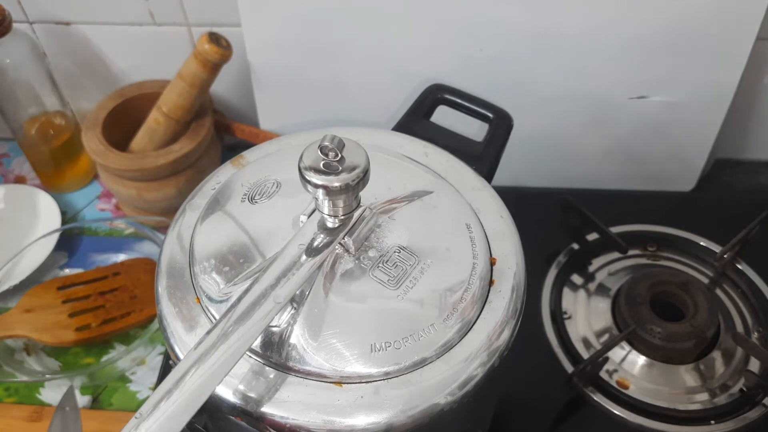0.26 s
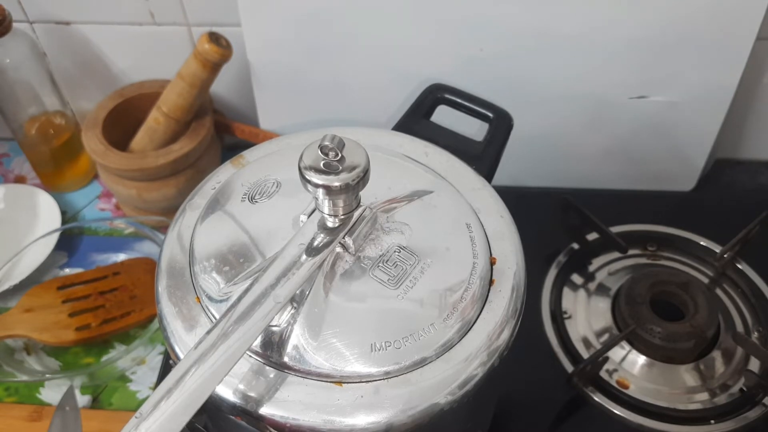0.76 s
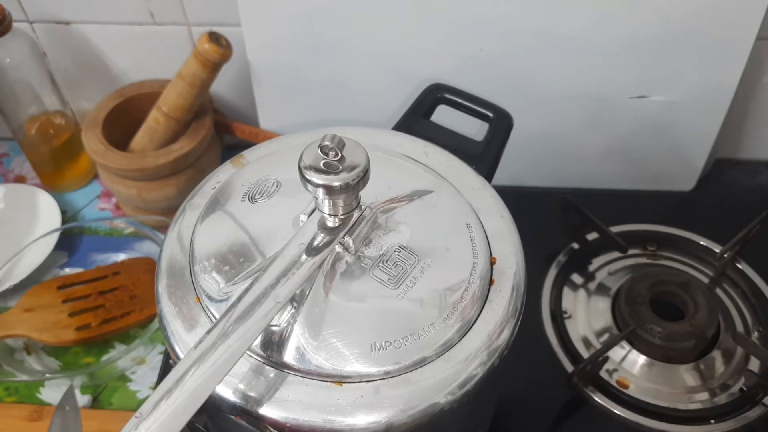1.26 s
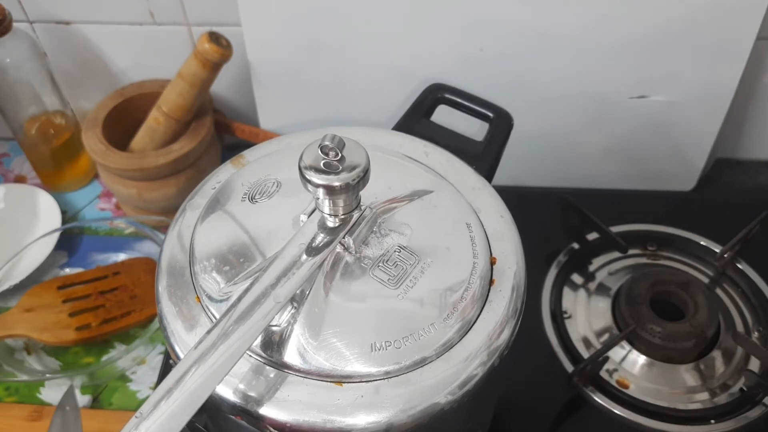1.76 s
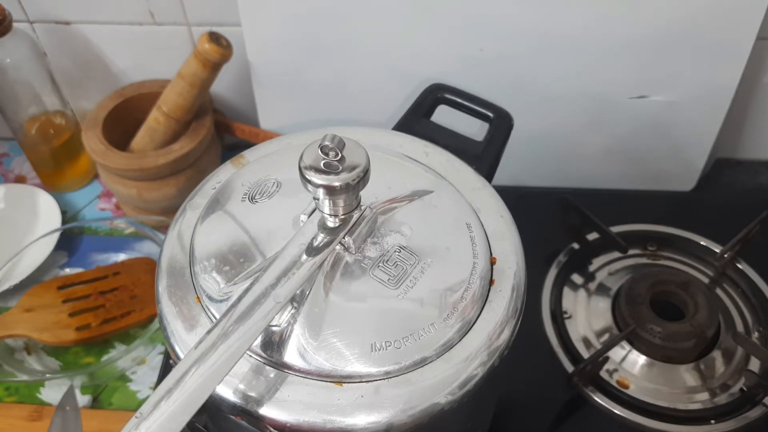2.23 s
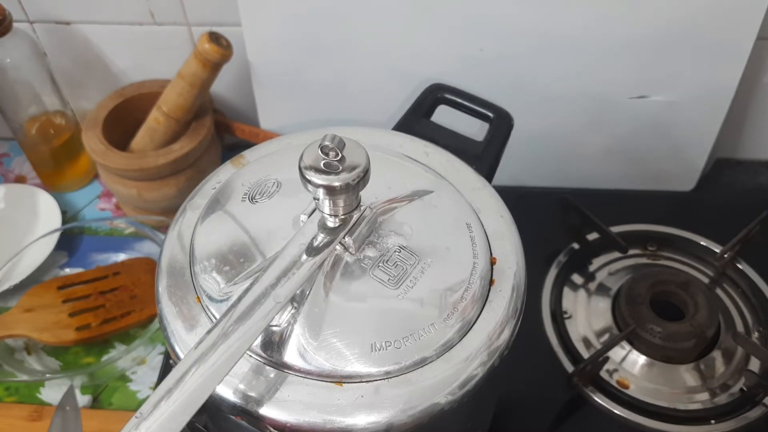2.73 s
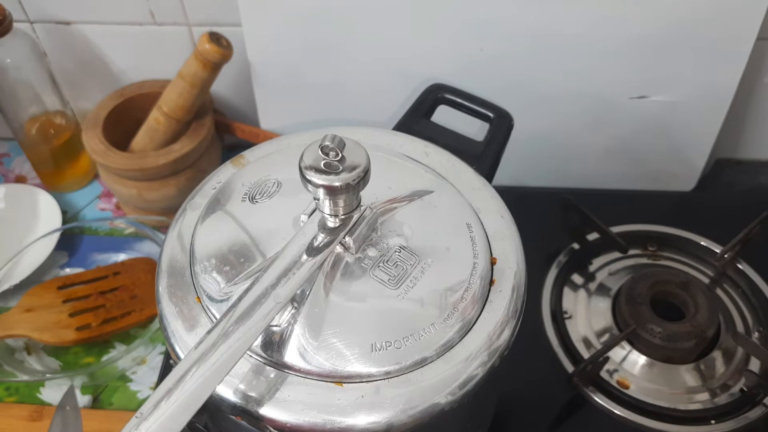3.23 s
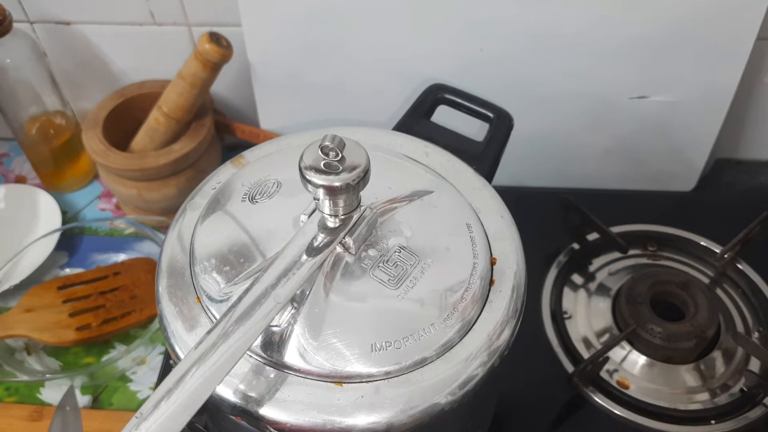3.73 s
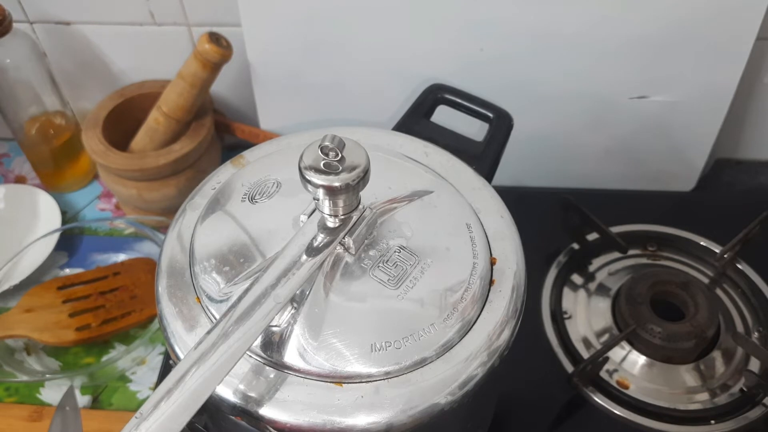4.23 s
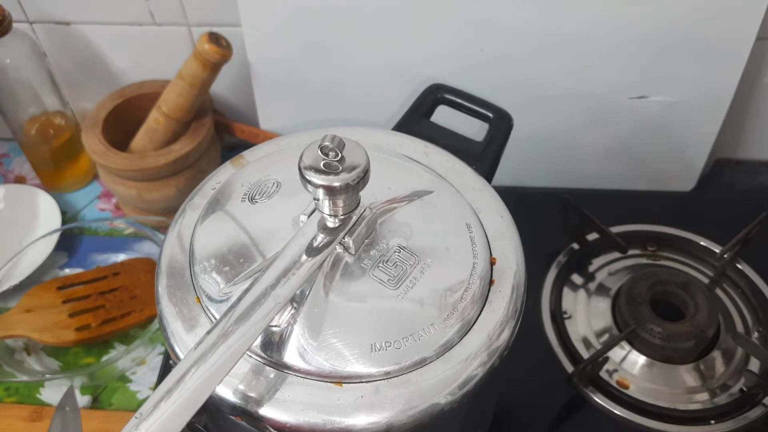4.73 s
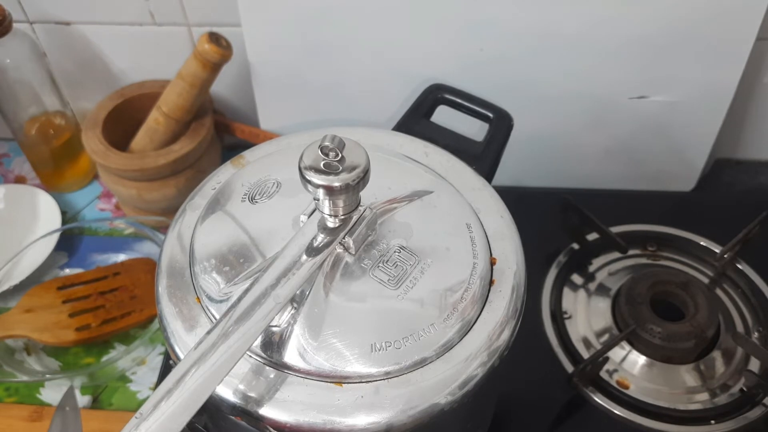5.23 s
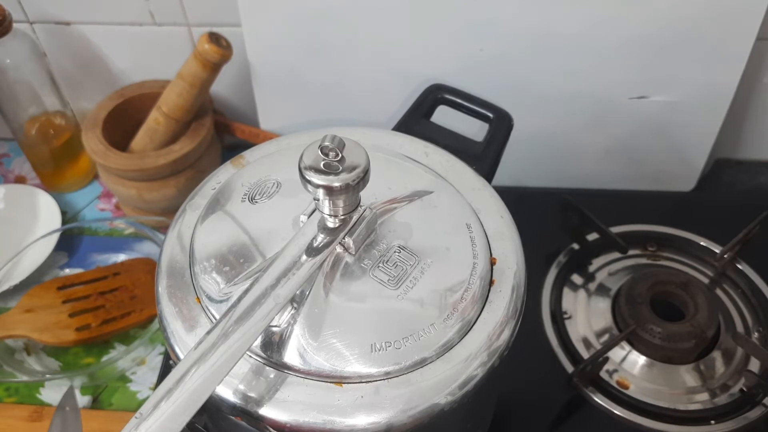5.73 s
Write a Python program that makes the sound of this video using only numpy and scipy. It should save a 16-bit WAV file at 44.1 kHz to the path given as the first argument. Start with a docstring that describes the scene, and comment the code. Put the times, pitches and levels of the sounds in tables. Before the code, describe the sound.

Close up in a kitchen, steam leaks from a pressure cooker's valve with a thin, bright, fizzy hiss that never stops. It wavers unevenly at first, with a few tiny spits of water, holds steadier through the middle, then swells and dips again toward the end. The gas burner and a low hum are barely audible beneath it.

```python
"""Pressure cooker on a gas stove.

Steam hisses around the weight valve, surging and sagging. High flow lifts the weight and adds a rasp;
condensate spits in the gap. Valve, lid and wall colour both. Underneath: the plume's dull rush, the burner, a
faint hum and, near the end, one soft rustle."""
import sys
import numpy as np
from scipy import signal
from scipy.fft import rfft, irfft
from scipy.io import wavfile

SR = 44100
rng = np.random.default_rng(int(sys.argv[2]) if len(sys.argv) > 2 else 0)


def dump(signal):
    """Clip the signal to [-1, 1] and save it as 16-bit WAV at the path in sys.argv[1]."""
    limited = np.clip(np.atleast_2d(signal).T, -1, 1)
    pcm = np.round(limited * 32767).astype(np.int16)
    wavfile.write(sys.argv[1], SR, pcm)


N = 263718
TIME_S, FREQ_HZ = np.arange(N) / SR, np.fft.rfftfreq(N, 1 / SR)

# Jet surges. Each row: time in seconds, flow in dB, treble fizz in dB; levels act about their means.
JET_LEVELS = [(0.02, -30.3, -43.1), (0.28, -29.3, -39.4), (0.63, -30.4, -42.8), (0.79, -29.0, -38.1),
              (0.91, -31.6, -43.5), (1.13, -27.4, -38.7), (1.19, -31.3, -42.2), (1.25, -28.7, -38.1),
              (1.45, -28.8, -39.5), (1.58, -31.1, -43.8), (1.88, -28.8, -38.7), (1.96, -29.8, -41.9),
              (2.08, -28.3, -38.7), (2.23, -30.9, -44.2), (2.33, -29.0, -39.4), (3.56, -31.2, -40.7),
              (4.05, -27.2, -38.1), (4.13, -28.6, -39.7), (4.18, -31.4, -40.1), (4.45, -31.3, -42.4),
              (4.68, -29.1, -37.0), (4.98, -29.6, -39.0), (5.07, -30.8, -39.9), (5.33, -31.2, -39.7),
              (5.43, -32.8, -43.3), (5.55, -28.3, -36.4), (5.67, -27.4, -35.9), (5.77, -29.4, -39.0),
              (5.95, -28.7, -38.1)]
# Smooth jet spectrum. Each row: frequency in Hz, relative density in dB.
JET_SHAPE = [(2300, -27.5), (3250, -20.5), (3650, -7.5), (4900, -6), (5300, 0.15), (6300, -8), (8000, -3.5),
             (9900, 0.5), (10400, -4.5), (11600, -3), (13800, -5), (14300, -8), (15000, -14), (15700, -28)]
# Valve cap and lid resonances. Each row: centre in Hz, width in Hz, boost in dB.
VALVE_MODES = [(3041, 196, 4.4), (3732, 35, 2.0), (4115, 183, 2.0), (4706, 113, 4.6), (5307, 72, 1.6),
               (5672, 259, 6.8), (5906, 35, 6.8), (6085, 56, 7.7), (6350, 210, 8.9), (6693, 259, 8.3),
               (6906, 259, 9.0), (7201, 259, 5.9), (7340, 134, 2.4), (7599, 180, 7.3), (7952, 259, 11.0),
               (8306, 238, 10.9), (8682, 159, 6.7), (8770, 126, 4.2), (9071, 259, 7.9), (9358, 157, 5.1),
               (9626, 259, 6.3), (9916, 232, 4.7), (10278, 133, 7.2), (10581, 116, 7.0), (10901, 138, 6.0),
               (12450, 65, 3.3)]
# Steam plume spectrum. Each row: frequency in Hz, relative density in dB.
PLUME_SHAPE = [(150, -20), (500, -6), (1000, 1), (1600, 1.5), (2200, -1), (2800, 3), (5000, -21)]
# Gas flame and kitchen spectrum. Each row: frequency in Hz, relative density in dB.
BURNER_SHAPE = [(20, -17), (36, -13), (48, 2.5), (80, -2), (120, -1), (165, -8), (195, -4), (225, -12.5),
                (300, -8), (450, -11.5), (600, -15), (1000, -20.5), (2500, -16.5), (6000, -45)]
# Kitchen hum. Each row: frequency in Hz, rms level in dB.
HUM_TONES = [(99, -73), (145.5, -71.5), (409, -81)]
# Large condensate spits. Each row: start in seconds, level in dB ahead of the valve.
LARGE_SPITS = [(.550, -24.5), (0.985, -23.5), (1.797, -22), (1.995, -28), (2.080, -21.5), (3.012, -30),
               (3.974, -23), (5.665, -26), (5.686, -26)]


def gain_of(db):
    return 10 ** (np.asarray(db) / 20)


def unit_rms(x):
    return x / np.sqrt(np.mean(x ** 2) + 1e-20)


def over_freq(points):
    """Interpolates (Hz, value) points over log frequency."""
    hz, value = np.transpose(points)
    return np.interp(np.log(FREQ_HZ + 1), np.log(hz + 1), value)


def peak(centre_hz, width_hz):
    """Resonance curve of height 1."""
    return 1 / (1 + (2 * (FREQ_HZ - centre_hz) / width_hz) ** 2)


def filtered(x, response):
    return irfft(rfft(x) * response, N)


def noise(response):
    return unit_rms(filtered(rng.standard_normal(N), response))


def wander(rate_hz):
    """Random drift of rms 1, up to about rate_hz."""
    return noise(1 / (1 + (FREQ_HZ / rate_hz) ** 2))


def minimum_phase(db):
    """Response that rings only after it is struck."""
    cepstrum = irfft(np.log(gain_of(np.maximum(db, -100))), N)
    fold = np.r_[1, np.full(N // 2 - 1, 2), 1, np.zeros(N // 2 - 1)]
    return np.exp(rfft(cepstrum * fold))


def jet_swing_db():
    """Flow and fizz per sample, each about its mean."""
    times_s, *columns = np.transpose(JET_LEVELS)
    curves = [np.interp(TIME_S, times_s, db) for db in columns]
    return [curve - curve.mean() for curve in curves]


def weight_lift_db(flow_db, mid_threshold_db=0.7, ease_db_per_s=0.77, lag_s=0.054):
    """Excess flow raises the weight, slightly late and ever more easily as pressure builds."""
    threshold_db = mid_threshold_db - ease_db_per_s * (TIME_S - TIME_S.mean())
    excess_db = np.maximum(flow_db - threshold_db, 0)
    return np.interp(TIME_S - lag_s, TIME_S, excess_db)


def turbulence(flutter_db=0.5, flutter_hz=45, drops_per_s=220, drop_db=-12.5, spread_db=2.5):
    """Fluttering white jet noise with tiny bursting droplets."""
    steam = rng.standard_normal(N) * gain_of(flutter_db * wander(flutter_hz))
    sizes = gain_of(spread_db * np.minimum(rng.exponential(1, N), 3.5))
    drops = sizes * rng.choice([-1, 1], N) * (rng.random(N) < drops_per_s / SR)
    return unit_rms(steam + gain_of(drop_db) * unit_rms(drops))


def hiss(flow_db, fizz_db, lift_db, level_db=-29.25, sputter_hz=9, flicker_db=0.75, flicker_hz=22):
    """Four flickering jet bands; the lifted weight widens the gap and lets a lower rasp through."""
    rasp_db = -1.3 + 0.56 * flow_db + 2.5 * lift_db
    body_db = 0.62 * flow_db
    core_db = flow_db
    top_db = 1.06 * fizz_db + 0.37 * wander(sputter_hz)
    above_rasp = over_freq([(3200, 1e-9), (3650, 1)])
    above_body = over_freq([(6500, 0.29), (8200, 0.84)])
    above_core = over_freq([(9900, 0.021), (11500, 1)])
    bands = [(1 - above_rasp, rasp_db), (above_rasp - above_body, body_db),
             (above_body - above_core, core_db), (above_core, top_db)]
    sputter_db = 0.2 * wander(sputter_hz)
    jet = turbulence() * gain_of(sputter_db)
    out = np.zeros(N)
    for band, db in bands:
        out += filtered(jet, band) * gain_of(db + flicker_db * wander(flicker_hz))
    return gain_of(level_db) * out


def valve(x):
    """Jet spectrum, cap and lid resonances and a steep bass cut, at unit power gain."""
    modes_db = sum(db * peak(hz, width_hz) for hz, width_hz, db in VALVE_MODES)
    bass_cut_db = over_freq([(1200, -27), (2300, -2.5), (2750, -0.5), (2950, 1)])
    response = minimum_phase(over_freq(JET_SHAPE) + modes_db + bass_cut_db)
    return filtered(x, response / np.sqrt(np.mean(abs(response) ** 2)))


def kitchen(x, wet_db=-14, t60_s=0.073, predelay_s=0.003):
    """Scattered reflections off hob, wall and utensils."""
    age_s = TIME_S[:SR // 3]
    taps = rng.standard_normal(len(age_s)) * (age_s > predelay_s) * gain_of(-60 * age_s / t60_s)
    wet = signal.fftconvolve(x, taps / np.linalg.norm(taps))[:N]
    return (x + gain_of(wet_db) * wet) / np.sqrt(1 + gain_of(wet_db) ** 2)


def plume(flow_db, lift_db, level_db=-65.5, billow_db=0.9, billow_hz=6):
    """The cloud above the valve billows, swelling with flow and lift."""
    rush = noise(gain_of(over_freq(PLUME_SHAPE)))
    swell_db = 0.33 * flow_db + 0.8 * lift_db + billow_db * wander(billow_hz)
    return rush * gain_of(level_db + swell_db)


def burner(level_db=-62):
    """Steady low murmur of the flame."""
    return gain_of(level_db) * noise(gain_of(over_freq(BURNER_SHAPE)))


def hum(waver_hz=0.96, waver_db=2.5):
    """Faint tones wavering in pitch and level."""
    out = np.zeros(N)
    for hz, db in HUM_TONES:
        cycles = np.cumsum(hz + waver_hz * wander(rate_hz=3.2)) / SR
        amplitude = np.sqrt(2) * gain_of(db + waver_db * wander(rate_hz=5.2))
        out += amplitude * np.sin(2 * np.pi * cycles)
    return out


def spits(decay_s=0.003, small_per_s=2.5, small_db=-30):
    """Drops torn up in the gap, each a short puff: large ones timed, small ones random."""
    kicks = gain_of(small_db) * (rng.random(N) < small_per_s / SR)
    for start_s, db in LARGE_SPITS:
        kicks[round(start_s * SR)] += gain_of(db)
    envelope = signal.lfilter([1], [1, -np.exp(-1 / (decay_s * SR))], kicks)
    return envelope * rng.standard_normal(N)


def rustle(peak_s=5.76, width_s=0.069, centre_hz=800, width_hz=700, level_db=-64.5):
    """Brief soft swell of low-mid noise."""
    envelope = np.exp(-((TIME_S - peak_s) / width_s) ** 2)
    return gain_of(level_db) * noise(peak(centre_hz, width_hz)) * envelope


def scene():
    """Mono mix on two channels."""
    flow_db, fizz_db = jet_swing_db()
    lift_db = weight_lift_db(flow_db)
    leak = kitchen(valve(hiss(flow_db, fizz_db, lift_db) + spits()))
    mix = leak + plume(flow_db, lift_db) + burner() + hum() + rustle()
    return np.tile(mix, (2, 1))


def record(dry, cutoff_hz=15780):
    """Steep low-pass."""
    taps = signal.firwin(1023, cutoff_hz, window=("kaiser", 9), fs=SR)
    return signal.oaconvolve(dry, taps[None], "same")


dry = scene()
out = record(dry)
dump(out)
```